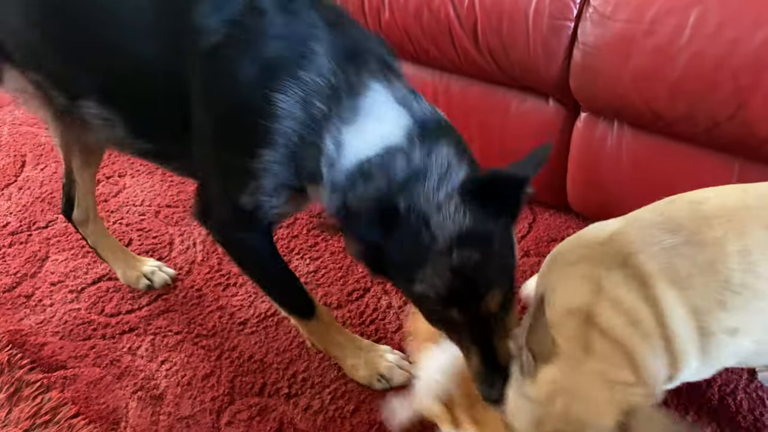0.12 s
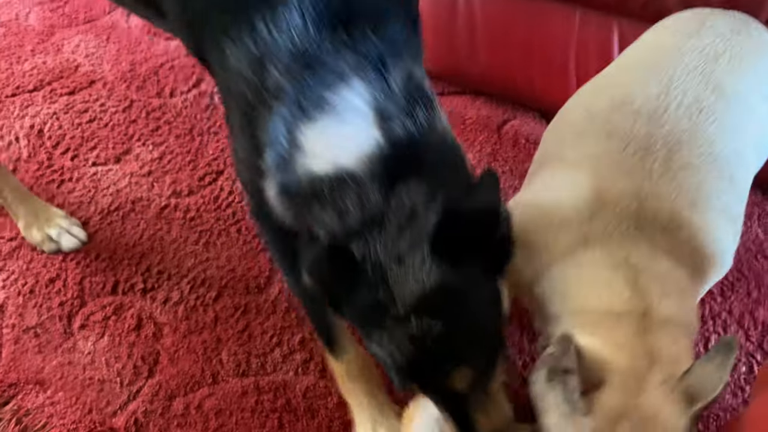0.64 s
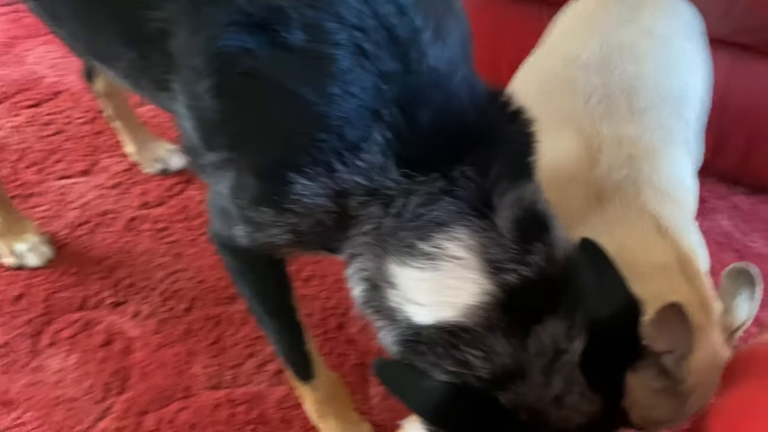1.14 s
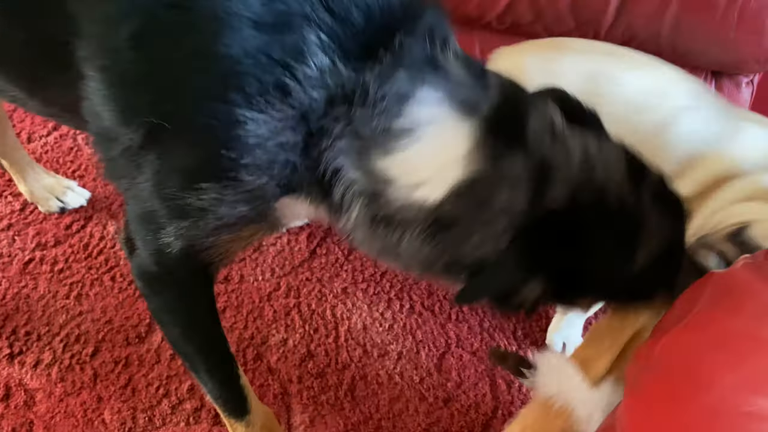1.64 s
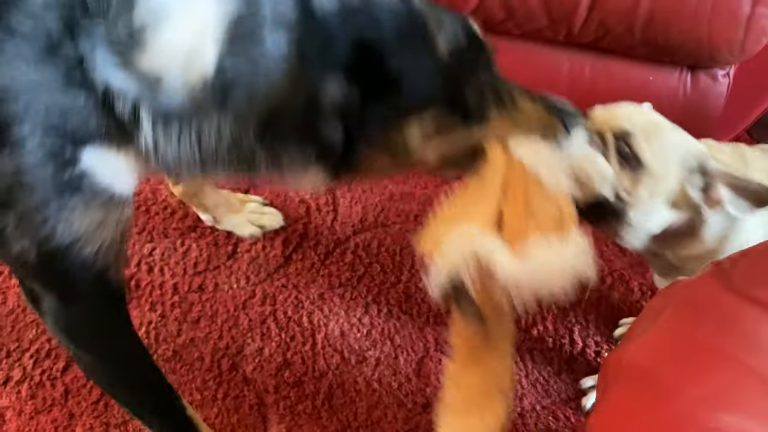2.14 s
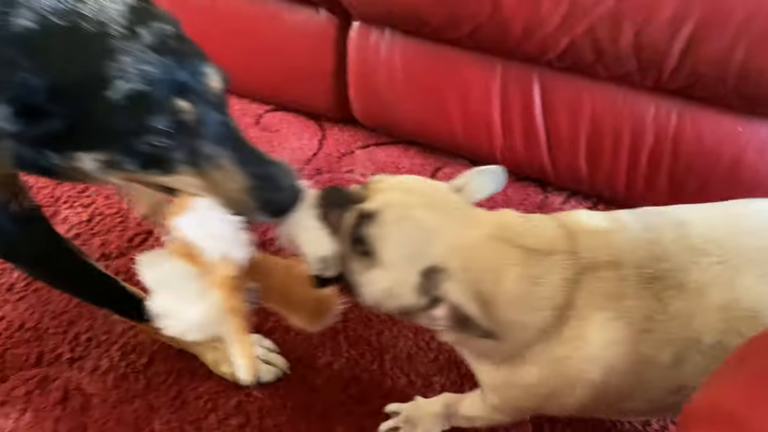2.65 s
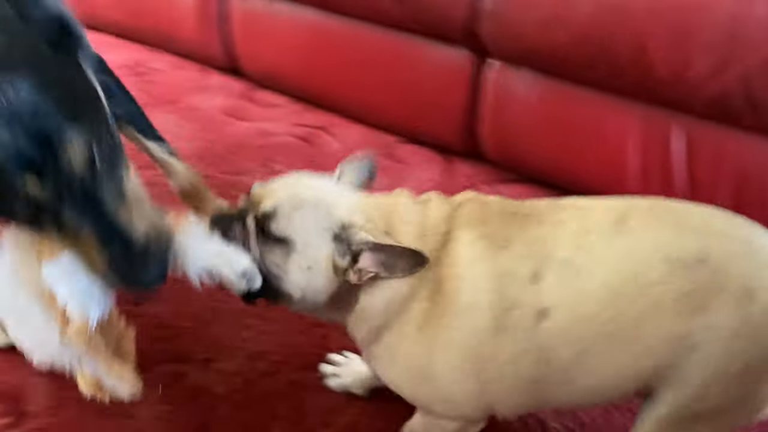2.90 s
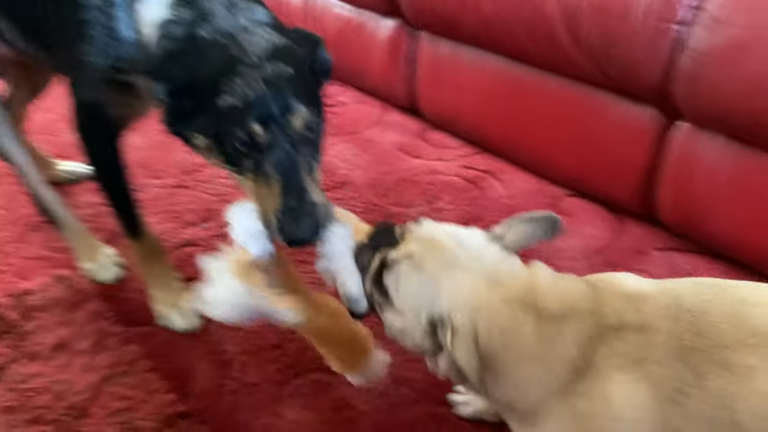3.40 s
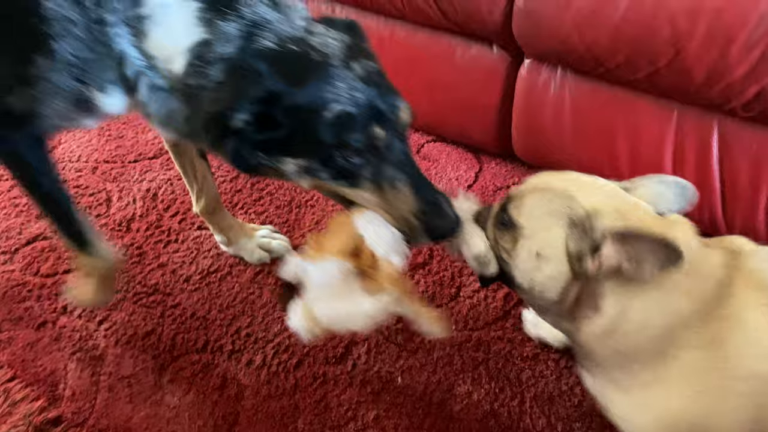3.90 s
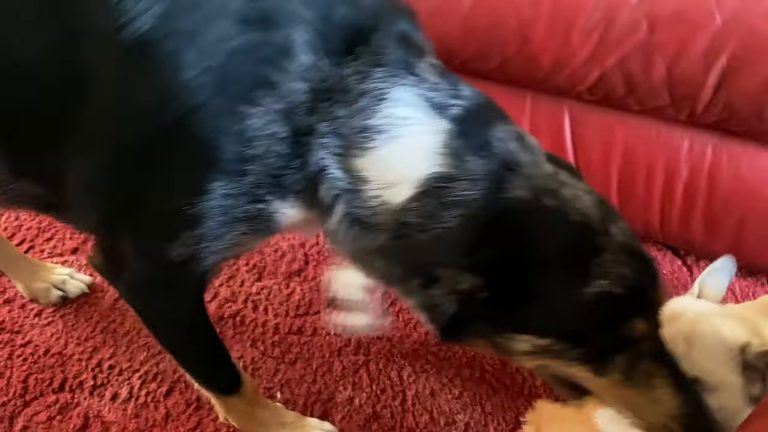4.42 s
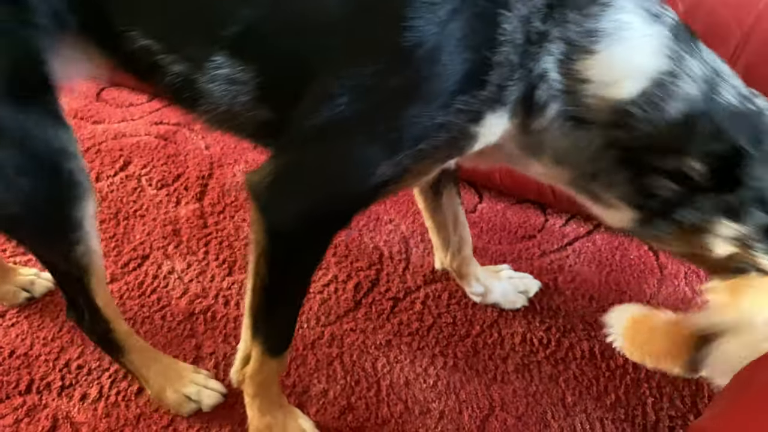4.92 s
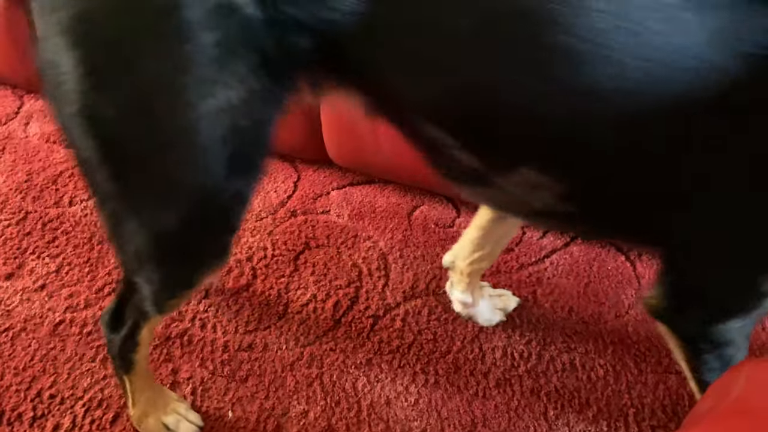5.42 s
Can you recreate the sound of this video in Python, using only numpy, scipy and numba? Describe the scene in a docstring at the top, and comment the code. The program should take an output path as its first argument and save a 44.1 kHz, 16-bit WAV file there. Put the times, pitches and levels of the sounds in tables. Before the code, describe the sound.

A close stereo pickup in a carpeted living room, with short, dry echoes and a faint steady hush. A loud, hoarse yip jumps out in the first 0.2 seconds, over a rough low growl lasting to about 0.8. A huff, a click and soft paw thuds follow at 0.65. From 1.1 to 2.3 a longer growl hums deep in the chest, throbbing and rattling through clenched jaws, with nose breath, rubbing cloth and clicks around 2.0. Huffs and a thud come at 2.3 to 2.7. A third growl runs from 2.7 to 3.6, with strong bright snorts near 3.2. Then mostly breath, huffs and scuffling, with a cluster of sharp mouth clicks and paw thuds around 4.1, a tiny low grunt at 4.3 and more thuds to 4.5. A last pulsing growl swells from 4.6 and continues to the end at about 5.5.

```python
"""In a living room with a thick carpet, two dogs tug a plush toy close to a small stereo microphone.
One growls through clenched jaws: a hum near 80 Hz beats with a second vibration and rattles in the mouth.
One hoarse yip is made of uneven pulses in open jaws; huffs, snorts and nostril breath are shaped noise.
Clicks of teeth and tongue and thuds of paws are short rings; cloth and paws scuffle as grainy noise.
Short echoes form the room, over a faint steady hush."""
import sys
import numpy as np
from scipy import signal
from scipy.fft import rfft, irfft, next_fast_len
from scipy.io import wavfile
from scipy.ndimage import uniform_filter1d
from numba import njit

SR = 44100
rng = np.random.default_rng(int(sys.argv[2]) if len(sys.argv) > 2 else 0)


def elevation(decibels):
    """Turn decibel levels (scalar or array-like) into linear amplitude ratios."""
    levels = np.asarray(decibels, float)
    return 10 ** (levels / 20)


def generate_wav(signal):
    """Clip the signal to [-1, 1] and save it as 16-bit WAV at the path in sys.argv[1]."""
    frames = np.transpose(np.atleast_2d(signal))
    scaled = np.clip(frames, -1, 1) * 32767
    pcm = np.round(scaled).astype(np.int16)
    wavfile.write(sys.argv[1], SR, pcm)


N = 244755   # length [samples]

# Growls, one list each: (time [s], pitch [Hz], hum level [dB], overtone base level [dB])
GROWLS = [
    [(0.0, 68.2, -46, -34), (0.2, 66.9, -40, -36), (0.31, 71.92, -30, -30), (0.386, 69.47, -36, -37),
     (0.554, 74.7, -33.5, -35.5), (0.62, 73.54, -47, -49), (0.698, 54.6, -46, -46.5), (0.9, 55.5, -78, -72)],
    [(1.085, 98.4, -55, -37), (1.105, 94.45, -28.5, -38), (1.153, 82.84, -32, -26),
     (1.225, 74.15, -25.5, -32), (1.499, 79, -27, -33.5), (1.7, 89.17, -30.5, -38),
     (1.935, 80.64, -30.5, -29.5), (2.047, 83, -31, -36), (2.213, 59.7, -40.5, -39.5),
     (2.38, 52.06, -57, -57)],
    [(2.718, 57, -61, -28), (2.8, 58.02, -45, -37), (2.922, 81.06, -29.5, -35.5), (2.968, 90.1, -29.5, -33),
     (3.068, 76.7, -36.5, -39), (3.146, 80.5, -30, -34.5), (3.306, 73.8, -32.5, -41.5),
     (3.41, 79.66, -29, -34), (3.5, 67.76, -37, -48), (3.56, 57.98, -46, -51), (3.7, 51.6, -65, -82)],
    [(4.26, 50.8, -77, -48), (4.282, 52.3, -31, -44), (4.32, 51.2, -42, -38), (4.38, 50.06, -65, -55)],
    [(4.57, 65.84, -40, -53), (4.62, 73, -33, -33), (4.7, 84, -32, -27.5), (4.802, 76.57, -32, -45),
     (4.902, 78.1, -24.5, -32), (5.014, 86.84, -28.5, -33.5), (5.15, 90.56, -30, -40),
     (5.26, 97, -28, -42.5), (5.408, 87.97, -29.5, -35.5), (5.494, 78.3, -38.5, -42),
     (5.55, 72.4, -24, -28)],
]
# Unevenness of the vocal cycles: (time [s], roughness [0-1])
ROUGHNESS = [(0, .8), (.6, .5), (1.1, .15), (1.25, .3), (1.6, .55), (2.4, .6), (2.7, .25), (3.0, .15),
             (3.1, .6), (3.25, .3), (3.5, .55), (4.6, .4), (4.75, .7), (4.9, .15), (5.1, .6), (5.3, .6),
             (5.42, .2)]
# Second, higher throat vibration: (start [s], length [s], starting level [dB], first pitch [Hz], last pitch [Hz])
SECOND_VIBRATION = [(0, 0.14, -39, 133.9, 119.7), (.13, 0.11, -35.5, 107.9, 108.8),
                    (.24, 0.19, -48.5, 138.2, 132.5), (.39, 0.23, -40, 114.5, 110.4),
                    (1.2, 0.29, -38, 100.8, 105.1), (1.5, .2, -30.5, 104.1, 101.9),
                    (1.72, 0.42, -32.5, 98.13, 99.6), (3.03, 0.091, -32.5, 123.8, 98.15),
                    (3.15, 0.086, -37, 99, 120.3), (3.385, .12, -38, 111.6, 111),
                    (4.65, 0.26, -35, 98.7, 102.2), (5.04, .2, -38.5, 132.8, 131.9),
                    (5.26, 0.097, -35, 138.7, 141.1)]
# Throat ring in each growl, over the overtone base, before a small trim: (at the start [dB], at the end [dB])
THROAT_RING = [(-24.5, -23.5), (-15, -17), (-18.5, -14), (-3.5, -18), (-20.5, -44)]
# Growl rattling in the mouth, one list per rattle:
# (time [s], level [dB], resonance [Hz], upper resonance over the main one [dB])
MOUTH_RATTLES = [
    [(0.16, -39.5, 935, -26), (0.246, -49.5, 980, -20), (0.32, -47, 844, -9.5), (0.5, -44, 950, -5),
     (0.6, -63, 904.7, -12)],
    [(1.08, -60, 582.4, -17), (1.156, -56, 568, -13), (1.272, -81, 560.4, 9), (1.544, -62, 784.8, -2),
     (1.734, -59, 598, -6), (1.946, -55.5, 819.3, 5.5), (2.024, -51.5, 721.4, -17), (2.2, -70, 719.7, -12)],
    [(2.718, -51, 637, -25), (2.728, -42.5, 603, -34), (2.8, -54.5, 625, -25), (2.956, -53, 605, -34),
     (3.042, -51.5, 773.4, -35), (3.16, -62, 758, 8), (3.212, -51, 740, -9.5), (3.33, -50.5, 717, -12),
     (3.46, -50.5, 673, -24), (3.54, -75, 690.5, -23)],
    [(4.62, -62, 794.6, -25), (4.66, -47.5, 808, -20), (4.732, -51, 812.6, -14), (4.798, -86, 755.4, -11),
     (4.894, -48.5, 863.5, -15), (4.962, -63, 781.4, -16), (5.322, -57.5, 690, -7.5), (5.5, -84, 730, -3)],
]
# Side of each rattle: (left over right [dB])
MOUTH_SIDES = [-1.5, -1, 5, 3]
# The yip, level before its peaks are flattened: (time [s], pitch [Hz], level [dB])
YIP = [(.025, 184.2, -43), (.038, 180.8, -29.5), (.054, 184.7, -15.5), (.065, 204.6, -29),
       (.068, 237.9, -9), (.09, 239.8, -13.5), (.096, 270, -19.5), (.11, 297.8, -22), (.135, 311, -34),
       (.18, 276, -47)]
# Resonances of the open jaws: (centre [Hz], width [Hz], relative level [dB])
OPEN_JAWS = [(270, 43, -7.5), (730, 210, -2.5), (1041, 74, 4), (1330, 92, -5), (1877, 200, -11)]
# First reflections from sofa and carpet, left then right: (delay [s], level [dB])
NEAR_ECHOES = [(.0009, -5), (.00143, -4)]
# Breathy huffs through the half-open mouth:
# (start [s], length [s], relative starting level [dB], first resonance [Hz], last resonance [Hz])
HUFFS = [(.637, .2, -33.5, 1030, 1330), (2.34, 0.11, -35, 860, 813), (2.6, 0.11, -41, 839, 917),
         (3.563, 0.17, -40.5, 710, 844), (3.92, 0.098, -44, 720, 890), (4.09, 0.077, -32, 803, 780),
         (4.39, .17, -40.5, 1030, 911)]
# Clicks of teeth, tongue and seams: (time [s], relative level [dB], ring [Hz], left over right [dB])
CLICKS = [(0.637, -37.5, 1150, 7.5), (1.933, -34.5, 896, 0), (2.01, -34, 768.3, 0), (2.037, -40, 710, 1),
          (2.066, -39, 575.4, 1.0), (2.262, -35, 1096, 5), (2.399, -33.5, 810, 0), (2.72, -48, 670, 1),
          (2.758, -32, 889.6, 4), (3.032, -41, 766, -1), (3.118, -43.5, 988, 9), (3.203, -40, 899, 7),
          (3.4, -42, 709.5, 14), (3.428, -37, 680, 6), (3.565, -33.5, 720, 6), (4.099, -27.5, 959, -3),
          (4.122, -27.5, 763, -9.5), (4.151, -31, 920, 6), (4.4, -35, 1075, 2), (4.534, -37.5, 895, -7),
          (4.661, -40.5, 801, -6), (4.875, -44.5, 707, 1)]
# Paws landing on the carpet: (time [s], relative level [dB], ring [Hz])
THUDS = [(0.647, -36, 149), (0.72, -43, 66.3), (0.847, -56, 86.77), (2.378, -36.5, 152.2),
         (2.564, -45.5, 329), (2.674, -43.5, 235.4), (3.814, -48.5, 70.2), (4.098, -41.5, 94.5),
         (4.14, -41, 157), (4.418, -41.5, 145.5), (4.451, -42, 112.8), (4.49, -46, 95.9),
         (4.539, -38, 118.7)]
# Nostril snorts: (peak time [s], length [s], relative peak level [dB])
SNORTS = [(.08, 0.18, -44), (.55, .14, -61), (.68, 0.088, -63), (1.37, 0.13, -48), (1.59, 0.33, -47.5),
          (1.92, 0.37, -49.5), (2.3, 0.15, -43), (2.41, 0.24, -45), (2.69, 0.19, -54), (2.91, 0.2, -47.5),
          (3.15, 0.15, -35.5), (3.23, 0.21, -32.5), (3.4, 0.21, -50.5), (3.73, 0.2, -53), (4.04, 0.35, -34),
          (4.42, 0.42, -51.5), (4.91, .1, -55), (4.78, 0.1, -59), (5.05, 0.29, -51)]
# Colour of a snort: (frequency [Hz], relative level [dB per Hz])
SNORT_COLOUR = [(1500, -26), (2500, -6.5), (3100, -9), (4000, -8), (4900, 2.5), (6200, -9.5), (8100, -11.5),
                (10000, -6.5), (12000, -5), (14000, -14), (15300, -12)]
# Paws and cloth dragging over the carpet: (peak time [s], length [s], relative peak level [dB])
SCUFFLES = [(.09, 0.65, -48), (.55, 0.11, -50), (.68, 0.26, -49.5), (1.37, 0.11, -46), (1.6, 0.42, -51.5),
            (1.92, 0.63, -45.5), (2.3, .14, -42.5), (2.41, 0.22, -43), (2.7, 0.51, -47.5),
            (2.92, 0.33, -48), (3.19, 0.31, -42.5), (3.4, 0.18, -51.5), (3.59, 0.22, -48),
            (3.82, 0.13, -49.5), (4.0, 0.24, -45), (4.13, 0.26, -40.5), (4.36, 0.42, -46.5),
            (5.48, 0.51, -50.5)]
# Colour of the scuffling: (frequency [Hz], relative level [dB per Hz])
SCUFFLE_COLOUR = [(120, -36.5), (200, -16.5), (232, 6.5), (269, -18.5), (308, -10.5), (387, -7.5),
                  (845, -1.5), (1090, -5.5), (2450, -8), (3080, -13.5), (5000, -19.5), (6500, -81),
                  (11000, -120)]
# Quiet activity between bursts: (time [s], relative breath level [dB], relative rubbing level [dB])
QUIET = [(0, -57, -69), (.42, -76.5, -66), (1.0, -70, -61), (1.5, -60.5, -57), (2.2, -68.5, -71),
         (2.9, -57.5, -54), (3.55, -65, -58.5), (4.7, -61, -58.5), (5.3, -70, -58.5), (5.55, -58.5, -54)]
# Breath through a narrow nostril:
# (start [s], length [s], starting level [dB], higher tube modes over the lowest [dB])
NOSTRIL_BREATHS = [(.32, 0.23, -74, -24), (3.7, 0.32, -62, -1), (4.02, .2, -56, -4), (4.23, 0.25, -57, 2),
                   (5.27, 0.27, -58, -27)]
# Higher modes of the nostril tube: (centre [Hz], width [Hz], relative level [dB])
NOSTRIL_MODES = [(5800, 670, 0.5), (7700, 500, -2), (9600, 500, -5)]
# Colour of the background hush: (frequency [Hz], relative level [dB per Hz])
HUSH_COLOUR = [(15, -38.5), (25, -24), (81, 3.5), (196, -7), (749, -9), (8550, -32), (10600, -74),
               (12100, -62), (13100, -32.5), (15000, -52)]
# How alike left and right noise are, before limiting to 0-1: (frequency [Hz], likeness [ratio])
LIKENESS = [(60, 0.98), (180, 0.36), (550, 0.19), (1650, 0.27), (4970, -2.43), (15000, 0.21)]
# Narrow gap in the treble of the whole sound, near 12 kHz: (lower edge [Hz], upper edge [Hz])
TREBLE_GAP = [11350, 12850]


def growl():
    """Vocal folds hum in the chest, a second vibration beats with them and each closure rattles the mouth."""
    gate, pitch, hum_db, octave_db = phrases(GROWLS)
    throat_lift_db = along(GROWLS, *np.transpose(THROAT_RING))
    rough, = in_time(ROUGHNESS)
    cycles = np.cumsum(pitch * (1 + 0.08 * rough * drift(25))) / SR
    turn = 2 * np.pi * cycles
    hum = fold_hum(turn, rough, hum_db, octave_db, throat_lift_db)
    second, second_knocks = second_vibration(turn)
    rasp = cut(rng.standard_normal(N), [100, 230], "band", order=1) * (1 + np.sin(turn))
    rasp = cut(rms_one(rasp), 350, "low", order=3)
    chest = gate * (np.sqrt(2) * (hum + second) + rough * elevation(hum_db - 10) * rasp)
    # the throat rings dully at each closure of either vibration
    knocks = pulses(cycles + 0.35 * rough * drift(60), uneven_db=2.0) + second_knocks
    throat = evened(twice_resonant(knocks, 324, 140, 380, 340), span=4000)
    chest += gate * elevation(octave_db + throat_lift_db - 2.5) * throat
    mouth, left_db = mouth_rattle(cycles, rough, knocks)
    return chest, mouth, left_db


def fold_hum(turn, rough, hum_db, octave_db, throat_lift_db):
    """Closed jaws let the overtones fall fast; throat ring lifts those above the octave, roughness smears them."""
    hum = elevation(hum_db + 4 * rough * drift(40)) * -np.cos(turn)
    for k, fall_db in enumerate([-2, -17, -23, -27, -31], start=2):
        lift_db = (throat_lift_db + 17) / 2 if k > 2 else 0
        level_db = octave_db + fall_db + lift_db + 1.5 * drift(15)
        smear = (0.3 + rough) * k / 2 * drift(14)
        hum -= elevation(level_db) * np.cos(k * turn + smear)
    return hum


def second_vibration(turn):
    """A higher throat vibration is coupled to the first, so sum and difference tones join in."""
    gain, pitch = held(SECOND_VIBRATION, edge_s=0.0069, fade_db=1.0)
    gate = gain > 0
    gain = gain * elevation(2.5 * drift(17.8))
    turn2 = 2 * np.pi * np.cumsum(pitch * (1 + 0.045 * drift(25))) / SR
    tone = np.sin(turn2) + elevation(-12) * np.sin(2 * turn2)
    tone += elevation(-6) * np.sin(2 * turn2 - turn) + elevation(-11) * np.sin(turn2 + turn)
    return gain * tone, gate * pulses(turn2 / (2 * np.pi), uneven_db=3.5)


def mouth_rattle(cycles, rough, knocks):
    """Fold closures and hissing air ring a moving mouth resonance, a steady nasal one and a higher one."""
    gate, level_db, hz, upper_db = phrases(MOUTH_RATTLES)
    # the head sways around each rattle's side
    left_db = along(MOUTH_RATTLES, MOUTH_SIDES, MOUTH_SIDES) + 4.5 * drift(3)
    closures = pulses(cycles + 0.25 * rough * drift(50), uneven_db=2.0) + rough * knocks
    # air hisses through the folds while they are apart
    closures += 0.018 * rng.standard_normal(N) * (1 + np.sin(2 * np.pi * cycles))
    low = evened(twice_resonant(closures, hz, 120, hz, 320), span=3000)
    nose = evened(twice_resonant(closures, 690, 90, 690, 240), span=3000)
    high = evened(twice_resonant(closures, 1840, 240, 1840, 300), span=3000)
    rattle = low + elevation(-5.5) * nose + elevation(upper_db) * high
    return gate * elevation(level_db + 1.3 * drift(7.8)) * rattle, left_db


def yip():
    """Quick uneven pulses and breath ring in wide-open jaws; the hardest peaks flatten softly."""
    pitch, level_db = in_time(YIP)
    cycles = np.cumsum(pitch * (1 + 0.025 * drift(80))) / SR
    source = pulses(cycles, uneven_db=1.5) + 0.028 * rng.standard_normal(N)
    voice = 0
    for k, (hz, width_hz, db) in enumerate(OPEN_JAWS):
        voice = voice + (-1) ** k * elevation(db) * resonance(source, hz, width_hz)
    voice = evened(cut(voice, 1900, "low", order=4), span=700)
    voice = phrases([YIP])[0] * elevation(level_db) * voice
    ceiling = 0.75
    return cut(ceiling * np.tanh(voice / ceiling), 1800, "low", order=3)


def huffs():
    """Lumpy breath noise passes through a gliding mouth resonance."""
    gain, hz = held(HUFFS, edge_s=0.002, fade_db=13)
    air = rng.standard_normal(N) * elevation(3.0 * drift(50))
    return gain * elevation(-12.5) * evened(twice_resonant(air, hz, 280, hz, 480), span=4000)


def mouth_clicks():
    """Teeth, tongue and seams give short, mostly pure rings with a crack."""
    return blows(CLICKS, cycles_long=2.8, noisy=0.1, crack_db=-6.5)


def paw_thuds():
    """Paws landing on carpet give low, noisy rings with a strong crack."""
    return blows(THUDS, cycles_long=3.17, noisy=0.44, crack_db=2.5)


def bustle():
    """Snorts and scuffles wander a little from side to side; nostril breath joins them."""
    breath_db, rub_db = in_time(QUIET)
    moving = snorts(breath_db) + scuffles(rub_db)
    return moving * panned(0.64, 1.2 * drift(3.82)) + nostril_breath()


def snorts(breath_db):
    """Air rushing through the nose makes bright noise, in bursts over quiet breathing."""
    gain = np.hypot(swells(SNORTS, rise_share=0.41, tail=1.39), elevation(breath_db))
    air = gain * banded_noise(SNORT_COLOUR, patchy_db=3.0, flicker=17.8, alike_at_least=0.077)
    # the nose is nearer the left port, so the right hears it 0.22 ms later
    air[1] = np.roll(air[1], round(0.00022 * SR))
    return air


def scuffles(rub_db):
    """Paws and cloth dragging over carpet make dull, grainy noise, in bursts over quiet rubbing."""
    gain = np.hypot(swells(SCUFFLES, rise_share=0.4, tail=1.65), elevation(rub_db))
    grains = elevation(0.55 * drift(150))
    return gain * elevation(2) * grains * banded_noise(SCUFFLE_COLOUR, patchy_db=3.5, flicker=25.0)


def nostril_breath():
    """A narrow nostril colours breath like a short tube, with a lowest mode and higher ones."""
    gain, higher_db = held(NOSTRIL_BREATHS, edge_s=0.019, fade_db=6)
    sides = []
    for air in rng.standard_normal((2, N)):
        lowest = rms_one(twice_resonant(air, 3890, 600, 3890, 900))
        higher = sum(elevation(db) * twice_resonant(air, hz, width_hz, hz, 2 * width_hz)
                     for hz, width_hz, db in NOSTRIL_MODES)
        sides.append(lowest + elevation(higher_db) * rms_one(higher))
    return gain * np.array(sides)


def near_echoes(x):
    """Sofa and carpet return one early reflection a side."""
    return np.array([elevation(db) * np.roll(x, round(delay_s * SR)) for delay_s, db in NEAR_ECHOES])


def room(x):
    """Eight feedback delays a side repeat the sound, quieter and duller on every round."""
    t60_s, wall_cut_hz = 0.21, 6100   # time for the bass to fall 60 dB; treble loss on each round
    size = next_fast_len(N + SR)
    hz = np.arange(size // 2 + 1) * SR / size
    spectrum, out = rfft(x, size), np.zeros((2, N))
    for k, lag_s in enumerate(np.geomspace(0.009, 0.041, 16)):
        loop = elevation(-60 * lag_s / t60_s) / (1 + 1j * hz / wall_cut_hz)
        loop = loop * np.exp(-2j * np.pi * hz * lag_s)
        echoes = irfft(spectrum * loop / (1 - loop), size)[:N]
        out[k % 2] += echoes * (-1) ** (k // 2)
    return out


def background_hush():
    """Faint stereo noise with slowly drifting bands lies under everything."""
    return elevation(-57.5) * banded_noise(HUSH_COLOUR, patchy_db=-0.5, flicker=0.62)


def blows(table, cycles_long, noisy, crack_db):
    """Each blow rings at its own pitch with a crack and a noise puff; a row may give its side."""
    size = 6000
    out, t = np.zeros((2, N + size)), np.arange(size) / SR
    for s, level_db, hz, *left_db in table:
        raw = rng.standard_normal(size)
        puff = rms_one(cut(raw, [0.2 * hz, 2.23 * hz], "band", order=2))
        crack = elevation(crack_db) * np.exp(-t / 0.0073) * cut(raw, [hz, 2.37 * hz], "band", order=2)
        shape = (1 - np.exp(-3.0 * t * hz)) * np.exp(-t * hz / cycles_long)
        blow = shape * (np.sin(2 * np.pi * hz * t) + noisy * puff) + crack
        at = round(s * SR)
        out[:, at:at + size] += panned(elevation(level_db + 4.0) * blow, sum(left_db))
    return out[:, :N]


def banded_noise(colour, patchy_db, flicker, alike_at_least=0):
    """Bands of stereo noise, each with its own level, wavering and left-right likeness; rms 1 in all."""
    out, together, white = 0, drift(flicker), rng.standard_normal((2, 2, N))
    lowest, highest = colour[0][0], colour[-1][0]
    count = round(1 + 2.5 * np.log2(highest / lowest))
    edges = np.geomspace(max(lowest, 20), min(highest, 16000), count)
    for k, (low, high) in enumerate(zip(edges, edges[1:])):
        # neighbouring bands use different noise
        mid, side = cut(white[k % 2], [low, high], "band", order=2)
        hz = np.sqrt(low * high)
        alike = np.clip(at_hz(LIKENESS, hz), alike_at_least, 1)
        gain = elevation(at_hz(colour, hz) + patchy_db * (0.24 * together + drift(11)))
        out = out + gain * (np.sqrt(1 + alike) * mid + np.sqrt(1 - alike) * side * [[1], [-1]])
    return rms_one(out)


def pulses(cycles, uneven_db):
    """One click per vocal cycle, of uneven size."""
    clicks = np.diff(np.floor(cycles), prepend=0)
    return clicks * elevation(uneven_db * rng.standard_normal(N)) + 1e-18


@njit
def resonate(x, hz, width_hz, sr):
    """A ringing filter whose centre can move; gain about 1 at the centre."""
    out, r = np.zeros(len(x)), np.exp(-np.pi * width_hz / sr)
    for i in range(2, len(x)):
        push = (1 - r * r) / 2 * (x[i] - x[i - 2])
        out[i] = push + 2 * r * np.cos(2 * np.pi * hz[i] / sr) * out[i - 1] - r * r * out[i - 2]
    return out


def resonance(x, hz, width_hz):
    """The same ringing filter at a steady or moving centre."""
    return resonate(x, hz + np.zeros(N), float(width_hz), float(SR))


def twice_resonant(x, hz1, width1_hz, hz2, width2_hz):
    """Two ringing filters in a row."""
    return resonance(resonance(x, hz1, width1_hz), hz2, width2_hz)


def cut(x, hz, kind, order):
    """Butterworth filter that removes part of the spectrum."""
    return signal.sosfilt(signal.butter(order, hz, kind, fs=SR, output="sos"), x)


def swells(rows, rise_share, tail):
    """Gain of bursts that swell to a peak and trail off, 20 dB down at both ends."""
    t, power = np.arange(0, N + 64, 64) / SR, 0
    for s, length_s, db in rows:
        before = ((s - t) / rise_share / length_s) ** 2
        after = np.abs((t - s) / (1 - rise_share) / length_s) ** tail
        power = power + elevation(2 * (db - 20 * np.where(t < s, before, after)))
    return np.interp(np.arange(N) / SR, t, np.sqrt(power))


def held(rows, edge_s, fade_db):
    """Gain of sounds that start, fade and stop; then a value gliding from first to last, if two are given."""
    t, gain, value = np.arange(N) / SR, np.zeros(N), np.full(N, 1.0 * rows[0][3])
    for s, length_s, db, *ends in rows:
        i = slice(round(s * SR), round((s + length_s + edge_s) * SR))
        u = t[i] - s
        edges = np.clip(np.minimum(u, length_s + edge_s - u) / edge_s, 0, 1)
        gain[i] += elevation(db - fade_db * u / length_s) * edges
        value[i.start:] = np.interp(t[i.start:] - s, [0, length_s], [ends[0], ends[-1]])
    return gain, value


def in_time(rows):
    """Columns of a curve at every sample."""
    s, *columns = np.transpose(rows)
    return [np.interp(np.arange(N) / SR, s, c) for c in columns]


def phrases(tables):
    """A soft-edged gate that is open during each table, then the joined columns."""
    t = np.arange(N) / SR
    gate = sum((t >= rows[0][0]) & (t <= rows[-1][0]) for rows in tables)
    return [uniform_filter1d(1.0 * gate, size=250)] + in_time(np.concatenate(tables))


def along(tables, first, last):
    """A value gliding from first to last through each table's time."""
    points = []
    for rows, a, b in zip(tables, first, last):
        points += [(rows[0][0], a), (rows[-1][0], b)]
    return in_time(points)[0]


def at_hz(points, hz):
    """A spectrum read on a logarithmic frequency axis."""
    points = np.array(points)
    return np.interp(np.log(hz), np.log(np.maximum(points[:, 0], 1)), points[:, 1])


def drift(rate):
    """Slow random wander of spread 1; a higher rate [Hz] wanders faster."""
    r = np.exp(-40 * np.pi * rate / SR)   # worked out at every 20th sample
    slow = signal.lfilter([1], [1, -2 * r, r * r], rng.standard_normal(N // 20 + 4002))[4000:]
    return np.interp(np.arange(N) / 20, np.arange(len(slow)), rms_one(slow))


def rms_one(x):
    """The sound scaled to rms 1."""
    return x / np.sqrt(np.mean(x ** 2) + 1e-20)


def evened(x, span):
    """The sound with its running rms, over span samples, brought to 1."""
    return x / np.sqrt(uniform_filter1d(x ** 2, size=span) + 1e-12)


def panned(x, left_db):
    """Mono to stereo, the left louder than the right by left_db."""
    return np.array([x * elevation(left_db / 2), x * elevation(-left_db / 2)])


def scene():
    """Dogs near the microphone, the room around them."""
    chest, mouth, mouth_left_db = growl()
    cry, huff, clicks = yip(), huffs(), mouth_clicks()
    voices = panned(chest, -1.2) + panned(mouth, mouth_left_db)
    voices += panned(cry, -0.31) + near_echoes(cry) + panned(huff, -0.5)
    to_walls = mouth + cry + huff + clicks.mean(axis=0) + elevation(-13.5) * chest
    walls = elevation(-11) * room(to_walls)
    return voices + clicks + paw_thuds() + bustle() + walls + background_hush()


def roll_off(x):
    """The treble ends steeply here."""
    return signal.sosfilt(signal.butter(12, 15680, fs=SR, output="sos"), x)


def record(dry):
    """The small microphone drops the deepest bass; the sound has a narrow gap near 12 kHz and a steep end."""
    mix = cut(dry, 56, "high", order=4)
    mix = cut(mix, TREBLE_GAP, "bandstop", order=4)
    mix = cut(mix, 15200, "low", order=12)
    return roll_off(mix)


dry = scene()
out = record(dry)
generate_wav(out)
```